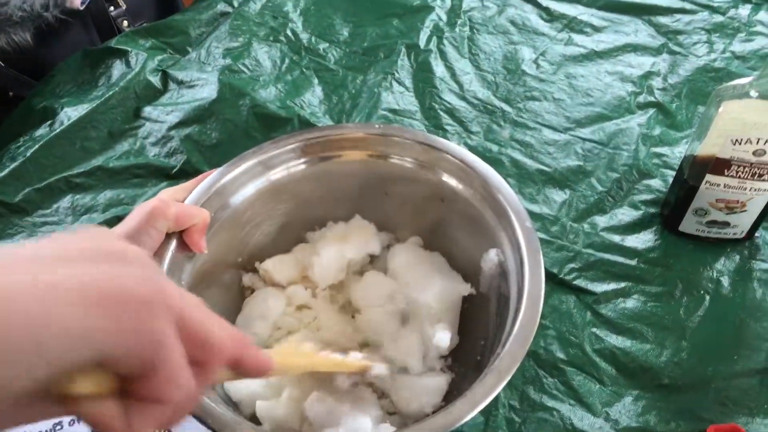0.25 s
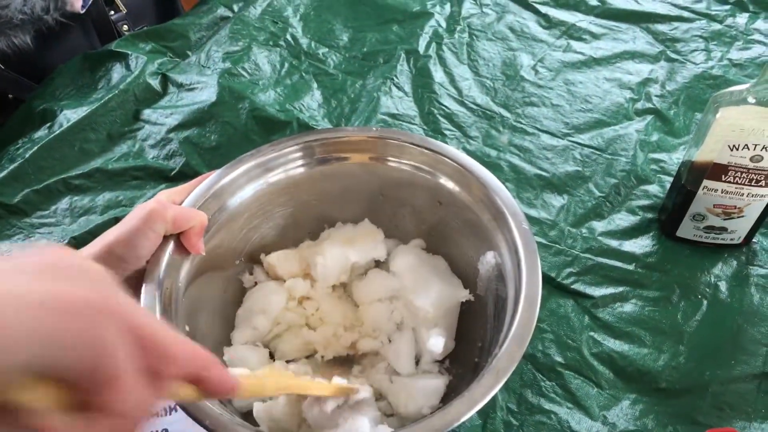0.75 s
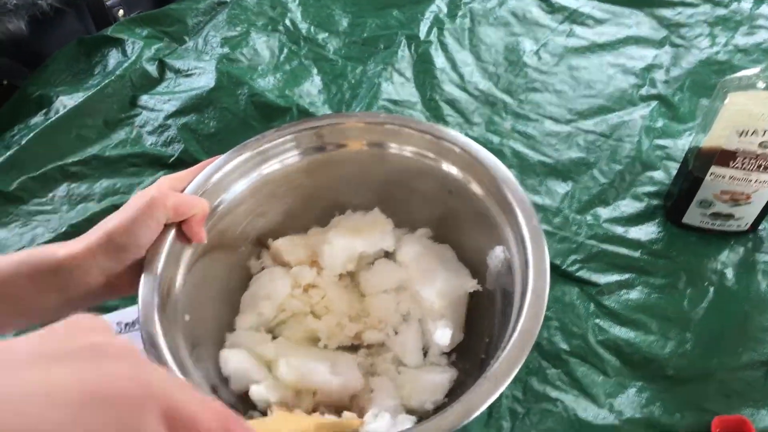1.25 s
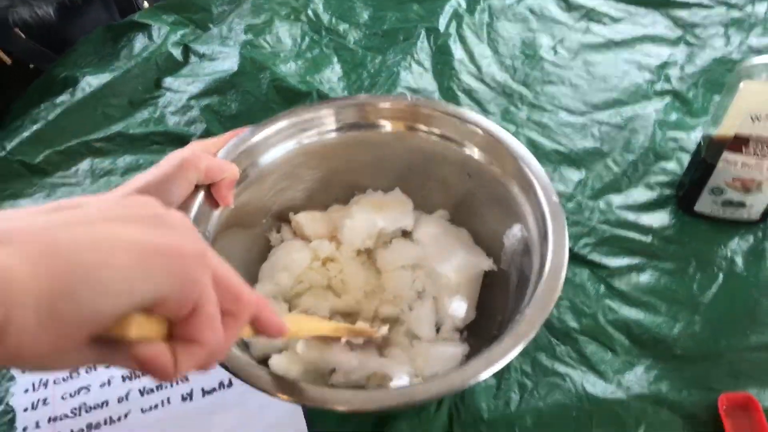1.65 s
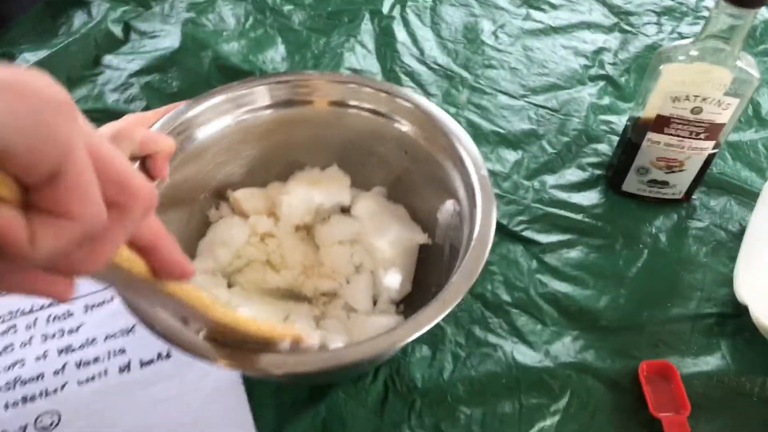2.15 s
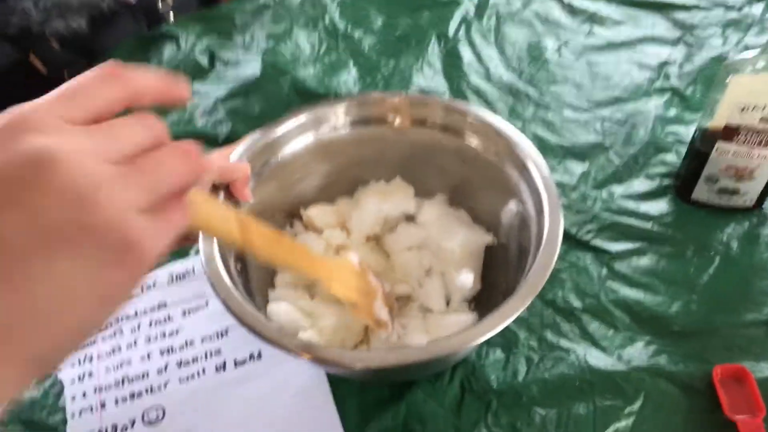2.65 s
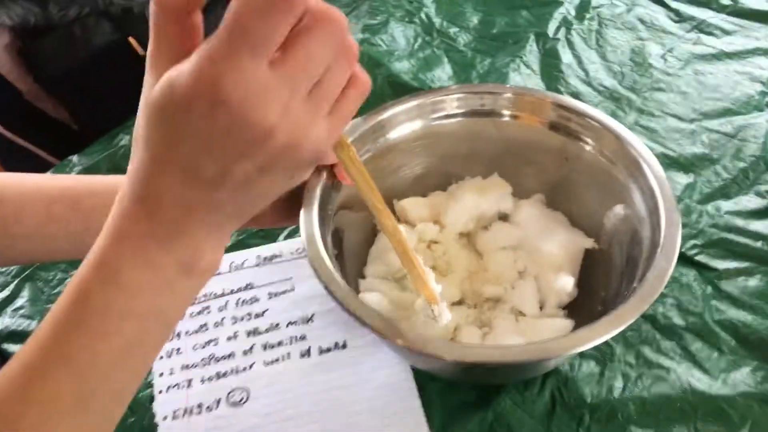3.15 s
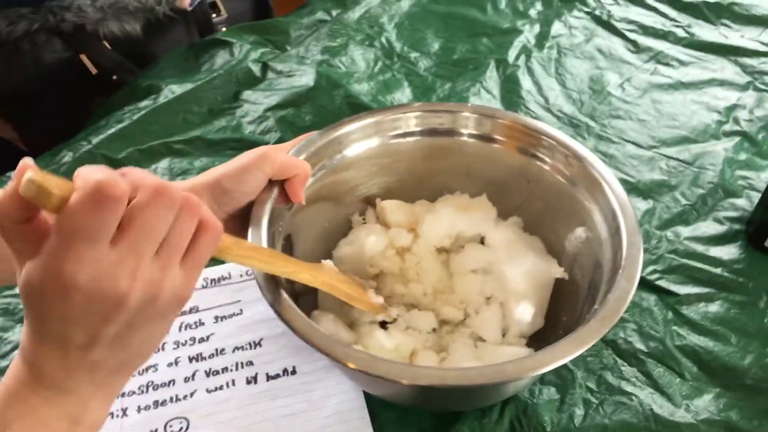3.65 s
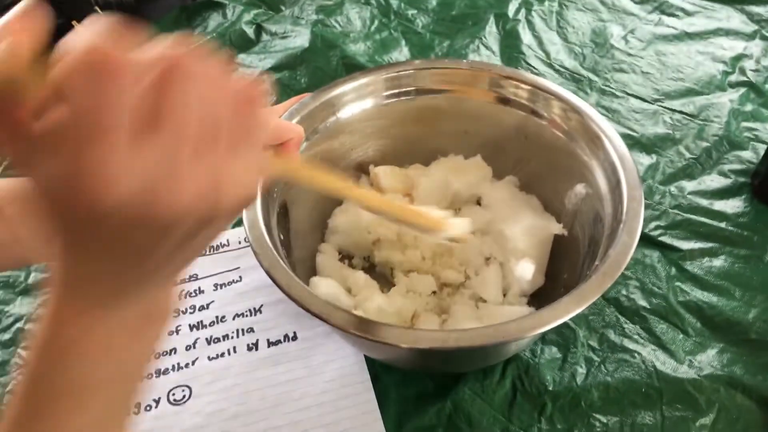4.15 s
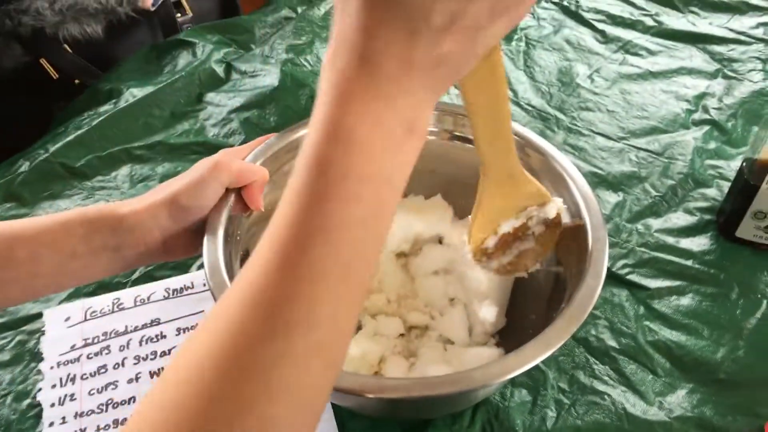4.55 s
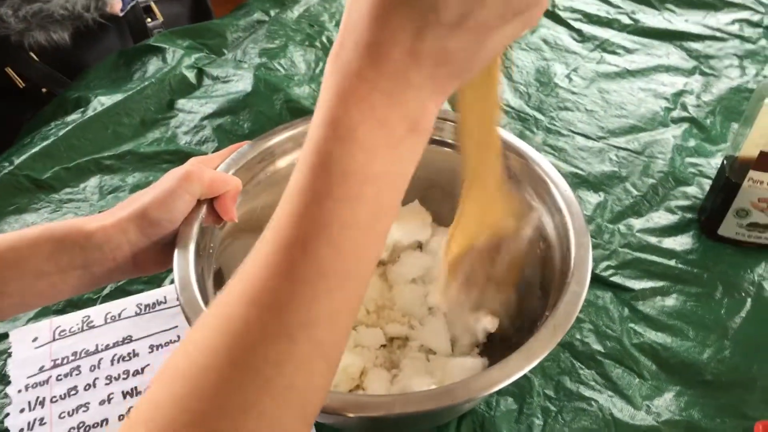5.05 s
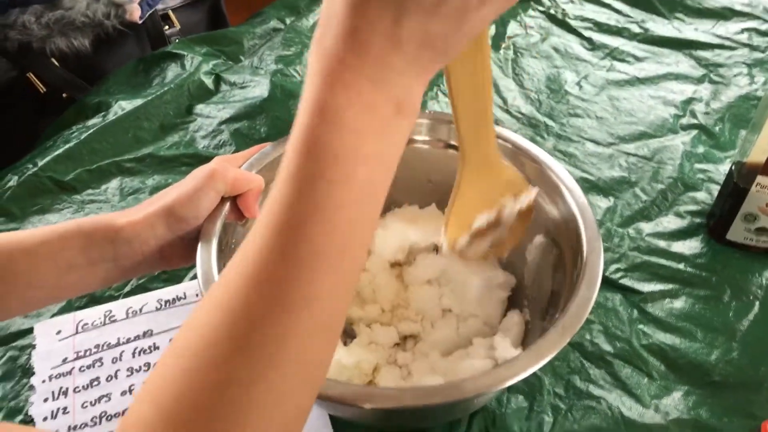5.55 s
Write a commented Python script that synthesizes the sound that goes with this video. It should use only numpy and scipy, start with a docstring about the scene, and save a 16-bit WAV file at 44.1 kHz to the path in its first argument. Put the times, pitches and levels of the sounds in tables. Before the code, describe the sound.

A wooden spoon crunches and scrapes through wet snow in a steel bowl, with cracks, short metallic knocks and two heavy table thuds late on.

```python
"""A wooden spoon stirs and mashes wet snow in a steel bowl, close to the microphone: shaped grain noise.
The spoon breaks through and knocks the bowl, heard as cracks over damped modes of steel. A hand steadies
the bowl on a table, which thuds in low modes, hardest in two downward stabs. In the slush, air pockets
plop as short sinking tones over a soft churning. A small, quiet room adds a faint echo and a noise hush."""
import sys
import numpy as np
from scipy import signal
from scipy.fft import rfft, irfft, next_fast_len
from scipy.io import wavfile
from scipy.ndimage import uniform_filter1d, map_coordinates

SR = 44100
rng = np.random.default_rng(int(sys.argv[2]) if len(sys.argv) > 2 else 0)


def inscribe(sig):
    """Save sig as 16-bit PCM at rate SR to the path in sys.argv[1].

    A 1-D sig is mono; a 2-D sig holds one channel per row.
    Samples are clipped to [-1, 1] before scaling.
    """
    pcm = np.round(np.clip(np.atleast_2d(sig).T, -1, 1) * 32767)
    wavfile.write(sys.argv[1], SR, pcm.astype(np.int16))


N = 255780  # samples, 5.8 s


def amp(db):
    """Decibels to gain."""
    return 10 ** (np.asarray(db) / 20)


def unit(x):
    """Scaled to rms 1."""
    return x / np.sqrt(np.mean(x ** 2) + 1e-20)


def along(points, hz):
    """(Hz, value) points read on a log frequency axis."""
    point_hz, value = np.transpose(points)
    return np.interp(np.log(hz + 1), np.log(point_hz + 1), value)


def filtered(x, response):
    """x with its spectrum multiplied by a response of frequency."""
    size = next_fast_len(len(x) + 8192)
    gain = response(np.fft.rfftfreq(size, 1 / SR))
    return irfft(rfft(x, size) * gain, size)[:len(x)]


def coloured(x, spectrum):
    """x filtered by the given spectrum, at rms 1."""
    return unit(filtered(x, lambda hz: amp(along(spectrum, hz))))


def wobble(rate):
    """A smooth random curve, rate knots a second."""
    knots = rng.standard_normal(int(N * rate / SR) + 4)
    return map_coordinates(knots, [np.arange(N) * rate / SR])


def patchy(x, depth_db):
    """The colour of x drifts at random in patches of time and frequency."""
    z = signal.stft(x, nperseg=256)[2]
    field = uniform_filter1d(rng.standard_normal(z.shape), size=12, axis=1)
    field = uniform_filter1d(field, size=4, axis=0)
    return unit(signal.istft(z * amp(depth_db * unit(field)), nperseg=256)[1][:N])


def add(track, s, sound):
    """Mix a sound into the track at time s."""
    part = track[max(round(s * SR), 0):][:len(sound)]
    part += sound[:len(part)]


def grains(rate, spread_db):
    """Tiny fractures of uneven size at random moments, rate a second on average."""
    happens = rng.random(N) < rate / SR
    return happens * rng.standard_normal(N) * amp(spread_db * rng.standard_normal(N))


def burst(spectrum, t, t60):
    """Coloured noise that dies away by 60 dB in t60 seconds."""
    return coloured(rng.standard_normal(len(t)), spectrum) * amp(-60 * t / t60)


def ring(modes, t, scatter_db=0, detune=0):
    """Damped modes; the point of contact and the shifting load of snow change their strength and pitch."""
    hz, db, t60 = np.transpose(modes)[:, :, None]
    size = amp(db + scatter_db * rng.standard_normal(db.shape))
    hz = hz * (1 + detune * rng.standard_normal(db.shape))
    phase = rng.random(db.shape) * 2 * np.pi
    waves = size * amp(-60 * t / t60) * np.sin(2 * np.pi * hz * t + phase)
    return np.sum(waves, 0) / np.linalg.norm(size)


BITE_S, RELAX_DB_PER_S = 0.051, 416  # the spoon bites in; the crunch dies when it stops


def push(t, length, swell_db):
    """One stroke: the spoon bites in, the snow packs or yields steadily, then the pressure relaxes."""
    bite = np.sin(np.pi / 2 * np.clip(t / BITE_S, 0, 1)) ** 2
    swell = swell_db * (np.clip(t / length, 0, 1) - .5)
    relax = RELAX_DB_PER_S * np.clip(t - length, 0, 1)
    return bite * amp(swell - relax)


# pushes of the spoon through the snow: start_s, length_s, crunch_db, swell_db (start to end),
# rub_db (on the steel, re crunch)
STROKES = [(-0.04, 0.28, -43.5, -12.5, -13.5), (0.212, 0.14, -63, -14, -11),
           (0.374, 0.26, -49.5, -6.5, -9.5), (0.66, 0.25, -52.5, -3.5, -13), (0.946, 0.14, -43, 6.5, -10),
           (1.077, 0.13, -54.5, 5.5, -5.5), (1.265, 0.14, -55, 6, -4.5), (1.4, 0.1, -66.5, 2, 1.5),
           (1.484, 0.21, -51.5, 9, -10), (1.736, 0.16, -55.5, 15.5, -14), (1.918, 0.12, -43, -15, -7),
           (2.051, 0.34, -57, 17.5, -4.5), (2.385, 0.18, -53.5, -16, -7), (2.526, 0.41, -67, -9.5, -2.5),
           (2.934, 0.069, -56.5, 8, -11.5), (3.036, 0.045, -51.5, 7, -25), (3.12, 0.093, -54.5, 9, -10.5),
           (3.219, 0.15, -56.5, 18.5, -13), (3.348, 0.12, -48, 23.5, -11.5), (3.532, 0.11, -49.5, 3, -17),
           (3.703, 0.086, -63, -3, -19), (3.809, 0.18, -54.5, -5.5, -2), (4.433, 0.28, -64.5, -18, -17),
           (5.08, 0.059, -34, 3, -22), (5.137, 0.18, -59, -23, -20), (5.326, 0.072, -52.5, 8.5, -16.5),
           (5.614, 0.071, -36, -8, -20), (5.673, 0.11, -57.5, -28, 1)]
# lumps that give way: start_s, level_db, length_s
LUMPS = [(0.033, -30.5, 0.013), (0.079, -32.5, 0.0079), (0.379, -36.5, 0.0066), (0.517, -37, 0.017),
         (0.6894, -45, 0.012), (0.899, -42.5, 0.011), (1.966, -29.5, 0.016), (2.1225, -35.5, 0.012),
         (2.528, -45.5, 0.015), (4.4093, -44, 0.025), (4.7047, -45, 0.019), (4.909, -39, 0.016),
         (4.932, -43, 0.015), (5.034, -51, 0.025), (5.078, -42, 0.031), (5.1, -33, 0.011),
         (5.619, -34, 0.024)]
# the spoon moves on to unstirred snow: time_s, crust_db (coarse crust, re crunch)
FIRMNESS = [(4.0, -22), (4.4, -3)]
# colour of the fine ice, the coarse crust and the rub on steel: pitch_hz, level_db (relative)
ICE_SPECTRUM = [(300, -36.5), (2000, -35), (4500, -25.5), (5400, -13.5), (6000, -14), (6600, -16.5),
                (7450, -25.5), (8200, -0.5), (9350, 1), (10100, -7), (11500, -6.5), (14000, -7),
                (15600, -14.5)]
CRUST_SPECTRUM = [(1000, -29), (4000, -12.5), (5000, -3.5), (5600, 4), (6400, -10), (7400, -20), (8400, 6),
                  (9400, 7), (10500, -20.5), (15000, -25)]
RUB_SPECTRUM = [(150, -11.5), (550, -1), (900, -9), (1300, -2.5), (2000, -3.5), (2900, -3), (3500, 1.5),
                (4200, -4), (5200, -1.5), (6400, -2.5), (8000, -9.5), (15000, -27.5)]
SETTLE_DB = -5  # slush that slides on the steel between strokes, re its churning
BREAK_S, LUMP_RUB_DB = 0.0027, -14.5  # time constant of a break; its rub on the steel re its crunch


def stirring():
    """Ice grains break in clumps ahead of the spoon and rub along the steel; now and then a lump gives way."""
    t = np.arange(N) / SR
    crunch_power = np.zeros(N)
    rub_power = amp(np.interp(t, *np.transpose(CHURNING)) + SETTLE_DB) ** 2
    for s, length, db, swell_db, rub_db in STROKES:
        stroke = amp(db) * push(t - s, length, swell_db)
        crunch_power += stroke ** 2
        rub_power += (amp(rub_db) * stroke) ** 2
    lump_t = t[:SR // 8]
    for s, db, length in LUMPS:
        lump = amp(db) * (1 - np.exp(-lump_t / BREAK_S)) * np.exp(-(lump_t / length) ** 2)
        add(crunch_power, s, lump ** 2)
        add(rub_power, s, (amp(LUMP_RUB_DB) * lump) ** 2)
    clumps = amp(1.1 * wobble(170) + 0.38 * wobble(35))
    # the spoon meets new snow all the time, so the colour keeps shifting
    ice = patchy(coloured(grains(rate=14000, spread_db=2.5), ICE_SPECTRUM), depth_db=2.0)
    steel = patchy(coloured(grains(rate=9000, spread_db=1.0), RUB_SPECTRUM), depth_db=3.5)
    crust = coloured(grains(rate=6000, spread_db=3.0), CRUST_SPECTRUM)
    crust = amp(np.interp(t, *np.transpose(FIRMNESS))) * crust
    return clumps * (np.sqrt(crunch_power) * (ice + crust) + np.sqrt(rub_power) * steel)


# colour of the cracking snow and of the hard snap: pitch_hz, level_db (relative)
CRACK_SPECTRUM = [(500, -37), (3000, -21.5), (7400, -25), (8200, -4), (9300, 0.5), (10300, -21.5),
                  (15500, -26.5)]
SNAP_SPECTRUM = [(7000, -25), (10500, -4), (11700, 0.5), (13000, -7.5), (15500, -4.5)]


def snow_crack(t, crack_db, snap_db):
    """The last snow breaks under the spoon: two short bursts of noise, dull crack and bright snap."""
    crack = amp(crack_db) * burst(CRACK_SPECTRUM, t, t60=0.036)
    return crack + amp(snap_db) * burst(SNAP_SPECTRUM, t, t60=0.037)


# clear modes of the bowl's free upper wall: pitch_hz, level_db (relative), t60_s
WALL_MODES = [(2417, -3.5, 0.19), (2700, -8, 0.3), (3410, -5, 0.17), (3516, -3, 0.35), (3720, 4, 0.075),
              (3850, 5, 0.16), (3920, -15, 0.216), (4600, -10, 0.37), (5180, -5, 0.15), (6345, -1.5, 0.13),
              (6930, -7, 0.17)]
# colour of the wall's dense modes: pitch_hz, level_db (relative)
WALL_SPECTRUM = [(1200, -13.5), (2000, -1.5), (2900, -2.5), (3500, 6), (4300, 1), (6300, 4), (8500, -9.5),
                 (12000, -18)]
FAVOUR_DB, FAVOUR_OCTAVES = 8, 0.35  # the spot that is struck favours one range of the wall's modes


def bowl_wall(t, contact, spot_hz):
    """A few clear modes of the wall over many short, dense ones, strongest around spot_hz."""
    dense = burst(WALL_SPECTRUM, t, t60=0.22) * (amp(2.5) * contact + amp(-8.0))
    wall = dense + amp(-5.0) * ring(WALL_MODES, t, scatter_db=2, detune=0.0019)

    def favour(hz):
        octaves = np.log2((hz + 1) / spot_hz)
        return amp(FAVOUR_DB * (np.exp(-(octaves / FAVOUR_OCTAVES) ** 2) - .5))

    return filtered(wall, favour)


# clear modes of the bowl's curved belly: pitch_hz, level_db (relative), t60_s
BELLY_MODES = [(1080, 4.5, 0.09), (1110, -1.5, 0.29), (1158, 1, 0.23), (1180, -5, 0.5), (1290, -7, 0.27),
               (1330, -6, 0.4), (1420, -8.5, 0.41), (1650, 2.5, 0.23), (1710, -3.5, 0.27),
               (1780, -13.5, 0.14), (1860, 2, .12)]
# colour of the belly's dense modes: pitch_hz, level_db (relative)
BELLY_SPECTRUM = [(600, -44), (1080, 6), (1400, 2), (1780, -1.5), (2050, -3.5), (2600, -17), (4000, -38.5)]


def bowl_belly(t):
    """The belly's clear modes over its dense ones, as decaying noise."""
    dense = amp(-3.0) * burst(BELLY_SPECTRUM, t, t60=0.2)
    return dense + amp(-2.5) * ring(BELLY_MODES, t, scatter_db=4.5, detune=0.0034)


# clear modes of the bowl's base, loaded with snow: pitch_hz, level_db (relative), t60_s
BASE_MODES = [(370.4, -11.5, 0.15), (465, -28.5, 0.1), (584.4, -3.5, 0.13), (594, 8.5, 0.051),
              (672, -8.5, 0.2)]
# colour of the base's dense modes: pitch_hz, level_db (relative)
BASE_SPECTRUM = [(40, -19), (130, 8.5), (280, -2.5), (400, -5), (600, -2), (800, -5), (1300, -31),
                 (4000, -62)]


def bowl_base(t):
    """The loaded base's clear modes over its dense ones, as decaying noise."""
    dense = amp(-3.5) * burst(BASE_SPECTRUM, t, t60=0.27)
    return dense + amp(5.5) * ring(BASE_MODES, t, scatter_db=1.0, detune=0.0041)


# spoon on the bowl: start_s, crack_db, snap_db, wall_db, belly_db, base_db, thud_db (table),
# spot_hz (the wall's favoured pitch)
BLOWS = [(0.994, -22.5, -28.5, -36, -55, -63, -45.5, 5740),
         (1.237, -21, -35, -33.5, -40, -43.5, -33.5, 4780), (1.937, -17, -14, -29.5, -42, -45, -43, 3130),
         (3.463, -28, -14.5, -31, -45.5, -51.5, -28.5, 5750),
         (3.8516, -46, -55, -42, -49.5, -48, -35.5, 4650), (4.457, -37, -42, -39, -43, -48.5, -61, 2120),
         (5.1463, -12.5, -20, -61, -26.5, -20.5, -17, 5600),
         (5.6882, -13.5, -25, -42, -37.5, -25.5, -40, 2200),
         (5.6956, -25.5, -25, -43, -44, -30, -18.5, 2300)]
# soft shoves that rock the table: start_s, level_db
SHOVES = [(0.393, -39.5), (0.534, -40), (3.907, -40), (3.978, -44.5), (4.939, -43), (5.082, -38)]
# modes of the table top: pitch_hz, level_db (relative), t60_s
TABLE_MODES = [(66.6, -9.5, 0.28), (106, 5, 0.15), (131, -0.5, 0.23), (162, -1.5, 0.075),
               (200.3, -5.5, 0.18), (259, -10, 0.11)]


def knocks():
    """The last snow cracks under the spoon; the bowl rings from wall to base and the table follows."""
    out, t = np.zeros(N), np.arange(SR // 2) / SR
    contact = np.exp(-((t - .0022) / 0.003) ** 2)
    for s, crack_db, snap_db, wall_db, belly_db, base_db, thud_db, spot_hz in BLOWS:
        crack = snow_crack(t, crack_db, snap_db) * (contact + amp(-15))
        wall = amp(wall_db) * bowl_wall(t, contact, spot_hz)
        lower = amp(belly_db) * bowl_belly(t) + amp(base_db) * bowl_base(t)
        thud = amp(thud_db) * ring(TABLE_MODES, t)
        # each part sets in a little later than the one above it
        add(out, s, (crack + wall) * (1 - np.exp(-t / 0.00097)))
        add(out, s + 0.00112, lower * (1 - np.exp(-t / 0.000476)))
        add(out, s + 0.0023, thud * (1 - np.exp(-t / 0.006)))
    for s, db in SHOVES:
        add(out, s, amp(db) * ring(TABLE_MODES, t) * (1 - np.exp(-t / 0.0055)))
    return out


# the larger air pockets: start_s, level_db, pitch_hz (starts at 1.35 times this, sinks toward 0.41)
PLOPS = [(1.128, -49, 1110), (1.706, -44, 370), (1.745, -40, 487), (2.195, -27.5, 720), (2.273, -33.5, 515),
         (2.68, -45.5, 410), (2.884, -42.5, 710), (3.235, -35.5, 1070), (3.299, -49, 460),
         (3.361, -43, 1020), (3.661, -49, 956)]
TICK_EVEN_HZ, TICK_DB_PER_OCTAVE = 980, 20.5  # pitch_hz of equal tick and plop gain; smaller pockets tick more


def plops():
    """Each air pocket opens with a tick of noise and a short tone that sinks in pitch."""
    out, t = np.zeros(N), np.arange(SR // 16) / SR
    tick_spectrum = [(300, 20), (900, 1.0), (2500, 8), (7300, 3.5), (9000, 11.5), (15000, -6)]
    for s, db, hz in PLOPS:
        pitch = hz * (0.406 + 0.945 * np.exp(-t / 0.0068))
        cycles = np.cumsum(pitch) / SR
        plop = np.sin(2 * np.pi * cycles) * (1 - np.exp(-t / 0.0018)) * np.exp(-(t / 0.0063) ** 2)
        tick_gain = amp(TICK_DB_PER_OCTAVE * np.log2(hz / TICK_EVEN_HZ))
        add(out, s, amp(db) * (plop + tick_gain * burst(tick_spectrum, t, t60=0.017)))
    return out


# churning of the slush, also followed by its slide on the steel: time_s, level_db
CHURNING = [(0.0, -68.5), (0.21, -74.5), (1.01, -70.5), (1.18, -67), (1.66, -64.5), (2.0, -63),
            (2.95, -67.5), (3.35, -61.5), (4.3, -73.5), (5.05, -67)]


def slush():
    """Wet snow churns softly: many smaller pockets burble over the dull shifting of the mass."""
    burble_spectrum = [(120, -31.0), (260, 0), (350, 3.0), (480, -17.0), (800, -19.0), (3000, -53)]
    churn_spectrum = [(30, -27), (105, -2.5), (220, 2), (600, -12.5), (5000, -57)]
    burble = coloured(grains(rate=83, spread_db=3), burble_spectrum)
    churn = coloured(grains(rate=820, spread_db=1.5), churn_spectrum)
    level = amp(np.interp(np.arange(N) / SR, *np.transpose(CHURNING)) + 0.55 * wobble(14))
    return level * (amp(-0.5) * burble + amp(-3.5) * churn)


# decay of the small room: pitch_hz, t60_s
ROOM_DECAY = [(100, 0.24), (1000, 0.53), (5000, 0.3), (9000, 0.2), (15000, 0.12)]


def room(x):
    """The walls answer 5 ms later with a tail of noise; the middle lasts longest, the top dies first."""
    hz, t, z = signal.stft(rng.standard_normal(SR // 2), SR, nperseg=256)
    decay = amp(-60 * t / along(ROOM_DECAY, hz)[:, None])
    tail = signal.istft(z * decay, SR, nperseg=256)[1]
    return signal.fftconvolve(np.pad(x, (SR // 200, 0)), tail / np.linalg.norm(tail))[:N]


# colour of the quiet room: pitch_hz, level_db (relative)
HUSH_SPECTRUM = [(20, -31), (35, -6.5), (60, 1.5), (130, -1), (200, -5.5), (350, -25), (600, -17.5),
                 (1200, -23), (3500, -26.5), (7300, -35.5), (8800, -25), (10500, -29.5), (15500, -33.5)]


def hush():
    """The quiet of the room: steady coloured noise."""
    return amp(-61) * coloured(rng.standard_normal(N), HUSH_SPECTRUM)


def scene():
    """The bowl close by, its echo and the hush of the room."""
    bowl = stirring() + knocks() + plops() + slush()
    return (bowl + amp(-15.0) * room(bowl) + hush())[None]


TOP_HZ = 15850  # band limit


def record(dry):
    """The small microphone loses the deep bass; a very steep filter cuts above the band limit."""
    highpass = signal.butter(4, 45, "highpass", fs=SR, output="sos")
    thin = signal.sosfilt(highpass, dry[0])
    return filtered(thin, lambda hz: 1 / (1 + (hz / TOP_HZ) ** 160))[None]


dry = scene()
out = record(dry)
inscribe(out)
```